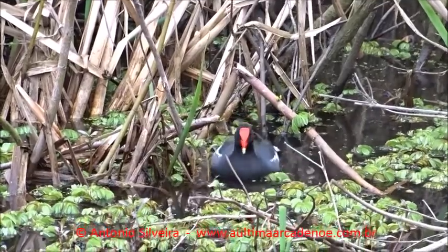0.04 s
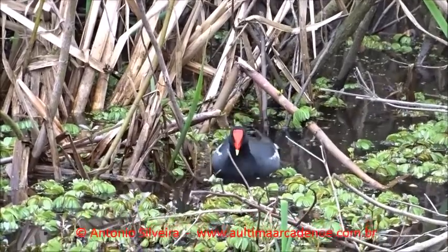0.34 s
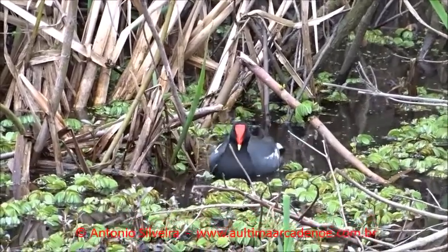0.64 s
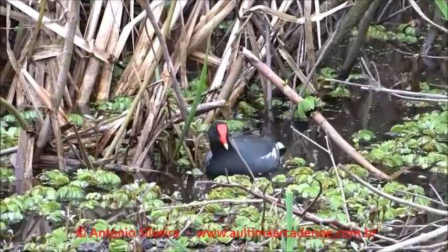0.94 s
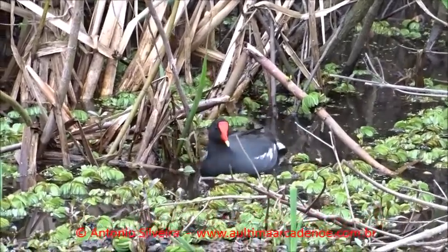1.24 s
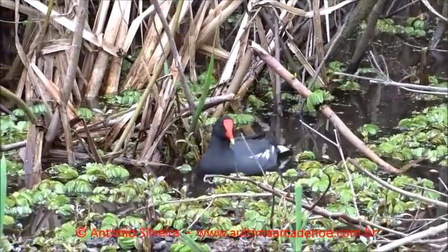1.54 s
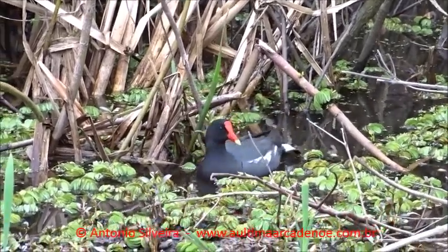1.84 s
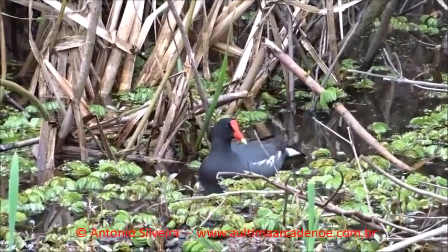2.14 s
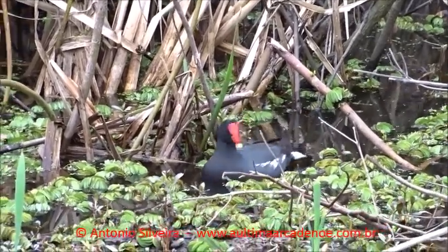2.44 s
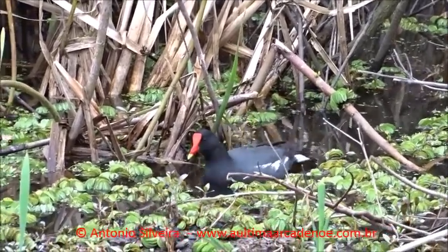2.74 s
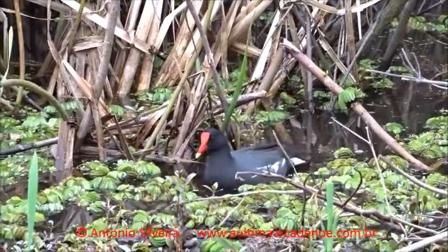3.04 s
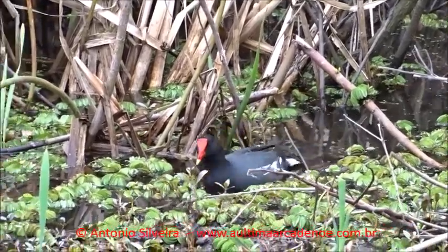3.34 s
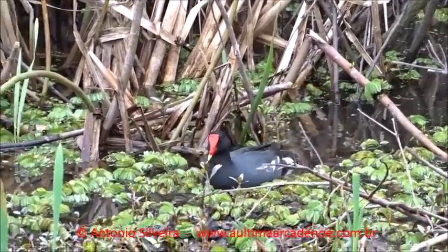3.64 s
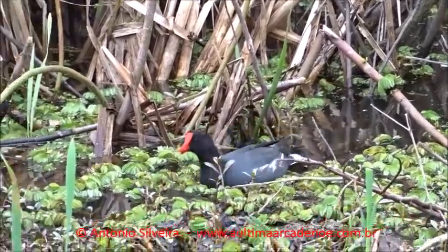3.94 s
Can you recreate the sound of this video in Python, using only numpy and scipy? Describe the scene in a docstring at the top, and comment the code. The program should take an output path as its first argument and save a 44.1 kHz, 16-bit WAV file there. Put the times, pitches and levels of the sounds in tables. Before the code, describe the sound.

After a lone hoarse rattle, a moorhen calls three times, each time rattling, yelping sharply and ending in a rising and falling wail. The microphone by the pond also catches faint ticking in the reeds and a steady low rumble.

```python
"""A lone harsh rattle sounds over a reedy pond: a moorhen, which goes on to give three phrases,
each a rattle, a loud yelp and a long arched wail. Its voice is a harmonic series led by the second
harmonic, pulsed in the rattles and breaking up in the yelps and wails. A small creature ticks in the
reeds and a far bird calls; later come one snap and a dull rush. Behind them lie a low rumble,
faint hums and the pulsing whirr of what may be a distant engine."""
import sys
import numpy as np
from scipy import signal
from scipy.fft import rfft, irfft, next_fast_len
from scipy.io import wavfile
from scipy.ndimage import uniform_filter1d, map_coordinates

SR = 44100
rng = np.random.default_rng(int(sys.argv[2]) if len(sys.argv) > 2 else 0)


def bounce(signal):
    """Save signal as a 16-bit WAV file at the path given by the first command-line argument."""
    frames = np.transpose(np.atleast_2d(signal))
    limited = np.clip(frames, -1, 1)
    pcm = np.round(limited * 32767).astype(np.int16)
    wavfile.write(sys.argv[1], SR, pcm)


N = 176400
TIME = np.arange(N) / SR
TOP_HZ = 15800


def amp(db):
    """Decibels to gain."""
    return 10 ** (np.asarray(db) / 20)


def unit(x):
    """Normalisation to rms 1."""
    return x / np.sqrt(np.mean(x ** 2) + 1e-20)


def along(points, hz):
    """Interpolation on a log frequency axis."""
    f, v = np.transpose(points)
    return np.interp(np.log(hz + 1), np.log(f + 1), v)


def curves(rows, at):
    """Linear interpolation of each later column against the first."""
    first, *columns = np.transpose(rows)
    return [np.interp(at, first, c) for c in columns]


def gate(t, start, end, fade):
    """A window with linear edges."""
    return np.clip(np.minimum(t - start, end - t) / fade + .5, 0, 1)


def wobble(rate, t):
    """Smooth random modulation, rate knots a second."""
    return map_coordinates(rng.standard_normal(N // 8), [(t - t[0]) * rate], mode="wrap")


def burst(start, attack, hold, t60):
    """Linear attack, hold and exponential decay."""
    age = TIME - start
    return np.clip(age / attack, 0, 1) * amp(-60 * np.maximum(age - hold, 0) / t60)


def filtered(x, response):
    """Filtering by multiplication of the spectrum."""
    m = next_fast_len(N + SR // 2)
    return irfft(rfft(x, m) * response(np.fft.rfftfreq(m, 1 / SR)), m)[..., :N]


# Likeness of left and right: frequency_hz, correlation
COHERENCE = [(30, 0.76), (80, 0.8), (180, 0.55), (350, 0.33), (700, 0.68), (1500, 0.77), (5000, 0.78),
             (14000, 0.97)]
def noise(spectrum):
    """Partly coherent stereo noise of rms 1, mixed from independent mid and side signals."""
    def response(hz):
        angle = np.arccos(along(COHERENCE, hz)) / 2
        return amp(along(spectrum, hz)) * [np.cos(angle), np.sin(angle)]
    mid, side = filtered(rng.standard_normal((2, N)), response)
    return unit(np.array([mid + side, mid - side]))


# Fixed colour of the overtones: frequency_hz, gain_db
THROAT = [(3500, 0), (5200, -4), (8500, 1), (14000, 0), (15500, -7)]
def overtones(t, hz, phase, balance, rasp_share):
    """Source and filter: harmonics 3 to 14, each in a band of rasp, are weighted by the throat."""
    orders = np.arange(3, 15)[:, None]
    early, late = curves(balance, orders)
    age = t - t[0]
    morph = np.interp(age / age[-1], [0.38, 0.85], [0, 1])
    shimmer_db = 6 * np.array([wobble(60, t) for k in orders])
    gains = amp(early + (late - early) * morph + along(THROAT, orders * hz) + shimmer_db)
    gains *= orders * hz < TOP_HZ
    opened = np.clip(age / (orders * .0016), 0, 1) ** 2  # higher harmonics open later
    rasp = np.array([wobble(1900, t) + 1j * wobble(1900, t) for k in orders]) / np.sqrt(2)
    offsets = rng.uniform(0, 2 * np.pi, orders.shape)
    partials = np.exp(1j * (orders * phase + offsets)) * (1 + rasp_share * rasp)
    return (opened * gains * partials.real).sum(0) / np.linalg.norm(gains, axis=0) / np.hypot(1, rasp_share)


def flutter(t, hz, rate_hz=178.1, slip_rad=1):
    """Amplitude modulation with a phase slip between pulses, both shallower at low pitch."""
    beats = np.cumsum(rate_hz * (1 + 0.033 * wobble(53.6, t))) / SR
    depth = np.interp(hz, [1270, 1600], [.25, 1])
    slip = depth * uniform_filter1d(slip_rad * rng.standard_normal(N)[beats.astype(int)], size=40)
    opening = depth * (-np.cos(2 * np.pi * beats) + .5 * np.cos(4 * np.pi * beats))
    return slip, unit(amp(6.5 * opening)), unit(amp(3 * opening))


# Where the voice breaks up: start_s, end_s, roughness
BREAKS = [(0.577, 0.648, 0.47), (0.78, 0.823, 0.48), (1.494, 1.55, 0.42), (1.65, 1.71, 0.5),
          (2.575, 2.66, 0.58), (2.72, 2.78, 0.07), (2.946, 2.953, 0.19)]
FADE_S, TREBLE_FADE_S = 0.00507, 0.0097
def call(rows, balance, roughness, hiss_db, body_db, treble_db, low_db, side_db=-10, pulsed=False):
    """A harmonic series with phase jitter; in the breaks a second, inharmonic oscillator joins."""
    start, end = rows[0][0], rows[-1][0]
    window = gate(TIME, start, end, FADE_S)
    t = TIME[window > 0]
    hz, second, treble, *low = curves(rows, t)
    breaking = sum(r * gate(t, a, b, 0.0026) for a, b, r in BREAKS)
    rough = roughness + breaking
    glide = 2 * np.pi * np.cumsum(hz * (1 + 0.0064 * wobble(69.6, t))) / SR
    jitter = 0.25 * rough * wobble(1500, t)
    slip, pulse, treble_pulse = flutter(t, hz) if pulsed else (0, 1, 1)
    phase = glide + jitter + slip
    upper = overtones(t, hz, glide + jitter / 2, balance, rasp_share=amp(hiss_db) + 4.8 * breaking)
    upper *= gate(t, start + TREBLE_FADE_S / 4, end - TREBLE_FADE_S / 4, TREBLE_FADE_S)
    side_gain = breaking * amp(side_db)
    side_tone = np.sin(1.62 * phase + 0.86 * wobble(254, t))
    body = (np.sin(2 * phase) + side_gain * side_tone) / np.hypot(1, side_gain)
    if pulsed:  # a hoarse noise band surrounds the second harmonic
        body += amp(1) * (wobble(1000, t) * np.sin(2 * phase) + wobble(1000, t) * np.cos(2 * phase))
        envelope = np.abs(signal.hilbert(body))
        body = unit(body / np.sqrt(envelope + .1)) / np.sqrt(2)
    fundamental = amp((low[0] if low else second) + low_db) * np.sin(phase)
    voice = pulse * (amp(second + body_db) * body + fundamental)
    voice += treble_pulse * amp(treble + treble_db) * upper
    out = np.zeros(N)
    out[window > 0] = np.sqrt(2) * voice * amp(1.4 * rough * wobble(461, t))
    return out * window


# One contour per rattle, levels relative: time_s, pitch_hz, second_harmonic_db, treble_db
RATTLES = [
    [(0.0, 1596, -32, -44), (0.05, 1660, -25, -34.5), (0.08, 1514, -23.5, -30.5), (0.11, 1120, -25.5, -38),
     (0.118, 1082, -45, -54)],
    [(0.33, 1502, -27, -37), (0.398, 1725, -19.5, -28), (0.414, 1547, -16.5, -23),
     (0.426, 1210, -13.5, -25), (0.442, 1135, -36, -48)],
    [(1.232, 1395, -26.5, -46.5), (1.272, 1790, -24.5, -27), (1.302, 1744, -21.5, -25),
     (1.327, 1184, -19.5, -36.5), (1.337, 1019, -39, -36)],
    [(2.295, 1520, -27.5, -38), (2.34, 1848, -21.5, -21.5), (2.372, 1710, -22, -18.5),
     (2.385, 1312, -13, -28), (2.4, 1090, -23, -33)],
]
# Overtone balance: harmonic, early_db, late_db
RATTLE_OVERTONES = [(3, -4, -27), (4, -11.5, -7), (5, -11.5, -7), (6, -3.5, 9), (7, -13, -14), (8, -10, -2),
                    (10, -4, -4), (14, -14, -15)]
def rattles():
    """Fast amplitude modulation spreads each harmonic into sidebands, heard as a rattle."""
    return sum(call(rows, RATTLE_OVERTONES, roughness=.3, hiss_db=5,
                    body_db=-1, treble_db=-3, low_db=-11, pulsed=True) for rows in RATTLES)


# Rumble envelope: time_s, level_db
RUMBLE_LEVEL = [(0.0, -28.5), (0.19, -24.5), (0.36, -26.5), (0.49, -22.5), (0.62, -36.5), (0.76, -24.5),
                (0.78, -30), (1.77, -28), (1.8, -25.5), (2.78, -27.5), (2.87, -23), (4.0, -26.5)]
# Rumble spectrum: frequency_hz, gain_db
RUMBLE_SPECTRUM = [(12, -35), (20, -9), (49, 1), (107, 0.5), (156, -1.5), (173, -7.5), (201, -5.5),
                   (242, -11), (315, -17), (400, -22.5), (520, -41), (880, -120)]
def rumble():
    """Low-frequency noise under a wavering envelope."""
    level, = curves(RUMBLE_LEVEL, TIME)
    return amp(level + 0.04 + 1.14 * wobble(14, TIME)) * noise(RUMBLE_SPECTRUM)


# Outdoor noise envelope: time_s, relative_db
AIR_LEVEL = [(0.0, -32), (0.5, -30.5), (0.59, -35), (3.0, -36.5), (4.0, -36)]
# Outdoor noise spectrum: frequency_hz, gain_db
AIR_SPECTRUM = [(200, -9.5), (400, 0.5), (700, 2), (1300, -0.5), (1900, -4), (2500, -14), (3200, -16.5),
                (4200, -23), (7000, -31), (11000, -35), (15500, -33)]
def air():
    """Broadband ambient noise, slowly modulated in level."""
    level, = curves(AIR_LEVEL, TIME)
    return amp(level + 4 + 1.7 * wobble(5.47, TIME)) * noise(AIR_SPECTRUM)


# Low tones: start_s, end_s, pitch_hz, level_db
HUMS = [(0, 1.7, 151, -35), (0, 0.6, 195.5, -33), (1.9, 2.7, 196, -36), (3, 3.55, 100.8, -31),
        (3.72, 3.94, 373.6, -35)]
def hums():
    """Pure tones waver by slow amplitude and phase modulation."""
    return sum(amp(db + 2.7 * wobble(4.79, TIME)) * gate(TIME, start, end, 0.021)
               * np.sin(2 * np.pi * hz * TIME + 0.5 * wobble(7.07, TIME)) for start, end, hz, db in HUMS)


# Whirr resonance: frequency_hz, gain_db
RESONANCE = [(1100, -15), (1400, 1.5), (1600, 12), (1700, 11.5), (1850, 5.5), (2300, -27)]
# Whirr envelope: time_s, relative_db
WHIRR_LEVEL = [(0.0, -32.5), (1.8, -28), (2.9, -38), (4.0, -34.5)]
def whirr(rate_hz=60, scatter_s=0.00201, scatter_db=3):
    """Impulse excitation: uneven pulses each ring one narrow resonance."""
    beats = np.arange(0, N / SR, 1 / rate_hz)
    late, size = rng.standard_normal((len(beats), 2)).T
    at = np.clip((beats + scatter_s * late) * SR, 0, N - 1).astype(int)
    pulses = np.bincount(at, amp(scatter_db * size), N)
    low_hz, high_hz = RESONANCE[0][0], RESONANCE[-1][0]
    ringing = filtered(pulses, lambda hz: amp(along(RESONANCE, hz)) * (hz > low_hz) * (hz < high_hz))
    level, = curves(WHIRR_LEVEL, TIME)
    return amp(level + 1.5) * unit(ringing)


# Ticks in the reeds: start_s, relative_db
TICKS = [(0.1748, -34.5), (0.3072, -34.5), (1.007, -41.5), (1.1358, -43), (1.4176, -36), (1.8357, -41),
         (2.1065, -39.5), (2.242, -40.5), (2.504, -35), (3.04, -34.5), (3.1777, -35.5), (3.315, -36),
         (3.454, -36.5), (3.5887, -37), (3.7419, -40), (3.874, -38.5)]
# Tick spectrum: frequency_hz, gain_db
TICK_SPECTRUM = [(2500, -33), (4300, 5), (5500, 5.5), (6400, 3), (7200, 7.5), (8200, -5), (11000, -31)]
def ticks():
    """A small creature's ticks: damped bursts of high noise, up to about seven a second."""
    envelope = sum(amp(db - 5.5) * burst(s, attack=0.00069, hold=0.0069, t60=0.14) for s, db in TICKS)
    return envelope * noise(TICK_SPECTRUM)


# A faint call: time_s, pitch_hz, level_db
FAR_WAIL = [(0.181, 1280, -42), (.25, 1533, -36), (0.301, 1614, -36.5), (.34, 1673, -33)]
def far_wail():
    """Attenuation with distance: only the second harmonic of a far bird carries."""
    hz, db = curves(FAR_WAIL, TIME)
    phase = 2 * np.pi * np.cumsum(hz) / SR
    return amp(db) * np.sin(2 * phase) * gate(TIME, FAR_WAIL[0][0], FAR_WAIL[-1][0], 0.022)


# One contour per yelp, levels relative: time_s, pitch_hz, second_harmonic_db, treble_db, fundamental_db
YELPS = [
    [(0.55, 1350, -18, -13, -25), (0.558, 1786, -16, -26, -30), (0.574, 1978, -9.5, -28, -24.5),
     (0.588, 1897, -12, -23, -23), (0.602, 1430, -16.5, -28, -40), (0.612, 1340, -23, -33, -48),
     (0.62, 1343, -15.5, -31, -35), (0.643, 1075, -34, -40, -48)],
    [(1.453, 1467, -21.5, -11, -30), (1.461, 1826, -14.5, -29, -29), (1.481, 1895, -7, -17.5, -24.5),
     (1.493, 1874, -8, -27, -24), (1.503, 1547, -16, -28, -47), (1.527, 1260, -13, -30, -53),
     (1.539, 1210, -23, -35, -33), (1.546, 1240, -18, -26, -37)],
    [(2.55, 1233, -18.5, -16, -29), (2.557, 1505, -26, -28, -28), (2.559, 1746, -9, -18, -31),
     (2.577, 2004, -6.5, -20.5, -21.5), (2.589, 1897, -12, -22, -23), (2.609, 1688, -14, -29.5, -39),
     (2.631, 1315, -14.5, -32, -26), (2.648, 1004, -28.5, -35, -58)],
]
# Overtone balance: harmonic, early_db, late_db
YELP_OVERTONES = [(3, 4.5, -2), (4, 4.5, -13), (5, -3.5, -0.5), (6, -9.5, 2), (7, -7.5, 7), (8, -9, 1),
                  (10, -11, -3), (14, -20, -7)]
def yelps():
    """Frequency modulation: a loud harmonic tone sweeps quickly up and down, breaking near its peak."""
    return sum(call(rows, YELP_OVERTONES, roughness=0.16, hiss_db=-5,
                    body_db=-2, treble_db=1, low_db=2.5, side_db=-9.5) for rows in YELPS)


# One contour per wail, levels relative: time_s, pitch_hz, second_harmonic_db, treble_db, fundamental_db
WAILS = [
    [(0.7, 968, -36, -44, -45), (0.718, 1171, -20.5, -35, -33), (0.754, 1279, -19.5, -30, -37),
     (0.768, 1383, -27, -29, -26.5), (0.81, 1450, -19, -27.5, -21.5), (0.864, 1506, -16.5, -36, -21.5),
     (0.894, 1393, -22, -33, -26), (0.92, 1140, -26.5, -40, -42)],
    [(1.62, 930, -32, -31.5, -51), (1.626, 990, -26, -41, -77), (1.636, 1208, -26.5, -40, -30),
     (1.652, 1363, -24, -27.5, -30), (1.74, 1536, -26, -31, -23), (1.784, 1364, -23, -39.5, -25.5),
     (1.8, 1020, -28, -40, -44), (1.805, 1007, -33, -42, -57)],
    [(2.712, 972, -40, -42, -42), (2.746, 1259, -15, -30, -29), (2.794, 1467, -31.5, -29.5, -20.5),
     (2.84, 1586, -14.5, -27, -26), (2.888, 1646, -15.5, -32.5, -28.5), (2.92, 1590, -11.5, -26.5, -26),
     (2.938, 1492, -21, -29.5, -22.5), (2.957, 1230, -22, -31, -43)],
]
# Overtone balance: harmonic, early_db, late_db
WAIL_OVERTONES = [(3, -10, 0), (4, -5, 2), (5, -13, -1), (6, 5.5, -3), (7, 2, -7), (8, 1.5, 2), (9, -2, -3),
                  (10, -10, -2), (14, -14, -14)]
def wails():
    """Biphonation: a long arched glide carries a second tone where it breaks."""
    return sum(call(rows, WAIL_OVERTONES, roughness=0.13, hiss_db=-9.5,
                    body_db=-1.5, treble_db=-0.8, low_db=1.5, side_db=6.5) for rows in WAILS)


# Snap spectrum: frequency_hz, gain_db
SNAP_SPECTRUM = [(1000, 4), (3000, 1), (6000, -6), (9500, 1), (12000, -11), (15000, -2)]
def snap():
    """One broadband transient with exponential decay."""
    return amp(-33) * burst(start=1.959, attack=0.00086, hold=0.0029, t60=0.11) * noise(SNAP_SPECTRUM)


# Envelope of a dull rush: time_s, level_db
SWELL_LEVEL = [(2.78, -51), (2.88, -31.5), (3.02, -27.5), (3.12, -62)]
# Its spectrum: frequency_hz, gain_db
SWELL_SPECTRUM = [(100, -38), (200, -1.5), (320, -9.5), (480, -15), (900, -35), (3000, -80)]
def swell():
    """Band-limited noise near 200 Hz rises and falls once."""
    level, = curves(SWELL_LEVEL, TIME)
    return amp(level) * noise(SWELL_SPECTRUM)


def stems(x, t60=0.014):
    """Early scattering from close stems, opposite in polarity left and right, widens the voice."""
    t = np.arange(SR // 20) / SR
    scatter = rng.standard_normal(len(t)) * amp(-60 * t / t60)
    return signal.fftconvolve(x, scatter / np.linalg.norm(scatter))[:N] * np.array([[1], [-1]])


# Decay time of the reed bank: frequency_hz, t60_s
BANK_DECAY = [(500, 0.068), (3000, 0.2), (8000, 0.2), (15000, 0.091)]
def reed_bank(x):
    """Reverberation: the reeds scatter a short tail, different on each side."""
    hz, t, spectra = signal.stft(rng.standard_normal((2, SR // 2)), SR, nperseg=256)
    decay = amp(-60 * t / along(BANK_DECAY, hz)[:, None])
    tail = signal.istft(spectra * decay, SR, nperseg=256)[1]
    tail = tail + 0.55 * tail[::-1]
    return signal.fftconvolve(x[None], tail / np.linalg.norm(tail[0]), axes=1)[:, :N]


def scene():
    """Superposition of direct and scattered sound, with the birds nearly straight ahead."""
    birds = rattles() + yelps() + wails() + far_wail()
    mix = birds * amp([[.3], [-.3]]) + amp(-18) * stems(birds) + amp(-7.5) * reed_bank(birds)
    mix += ticks() + snap() + rumble() + air() + hums()
    engine = whirr()
    return mix + amp(-6) * engine + amp(-4) * reed_bank(engine) + swell()


def record(dry):
    """An ideal low-pass filter limits the bandwidth."""
    return filtered(dry, lambda hz: hz < TOP_HZ)


dry = scene()
out = record(dry)
bounce(out)
```